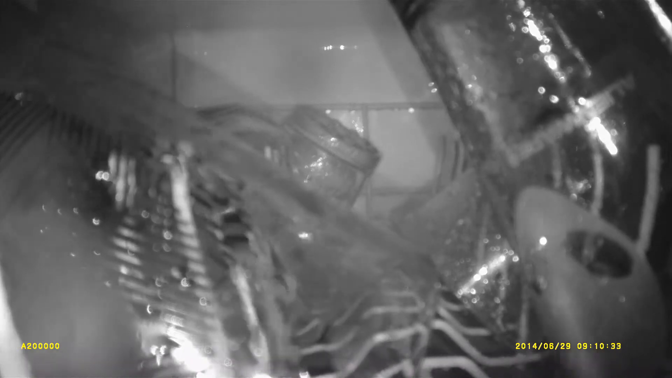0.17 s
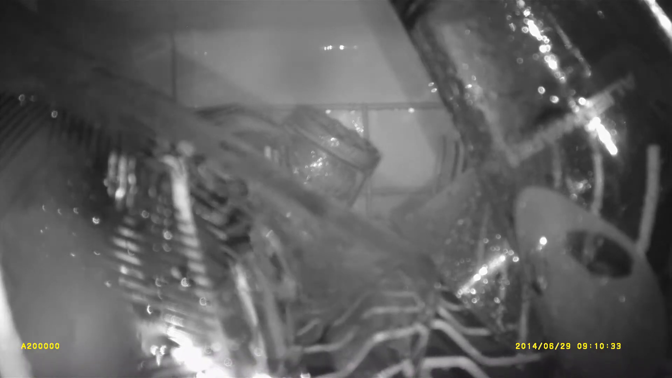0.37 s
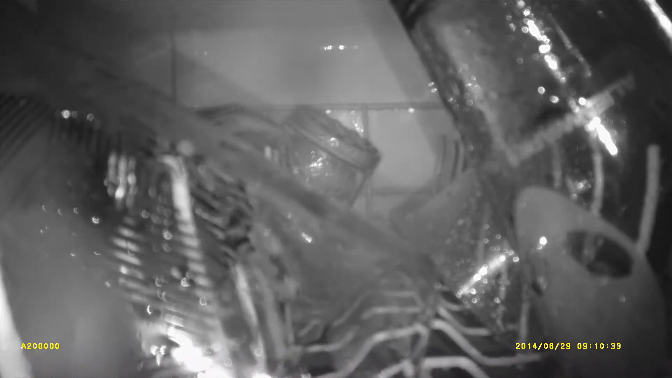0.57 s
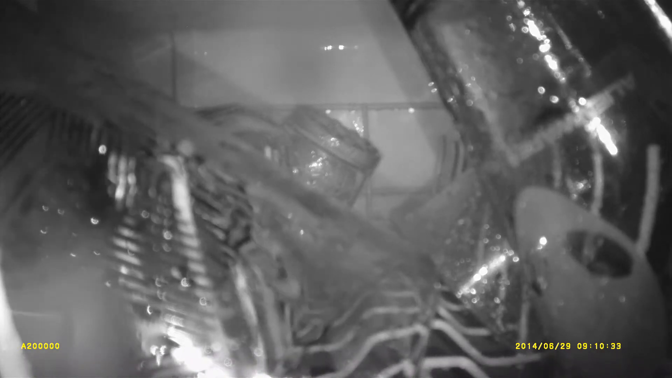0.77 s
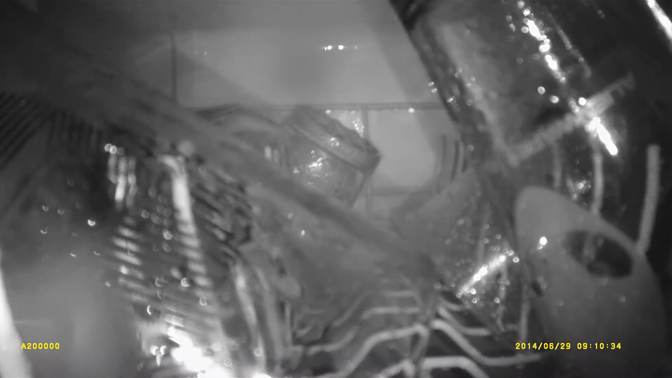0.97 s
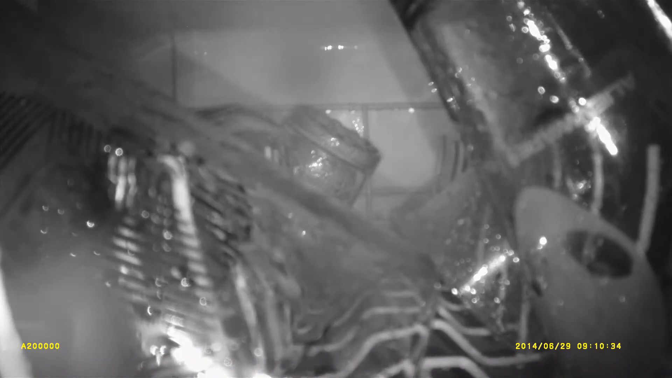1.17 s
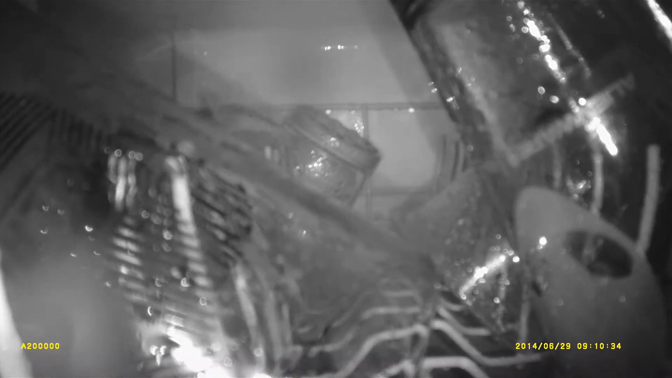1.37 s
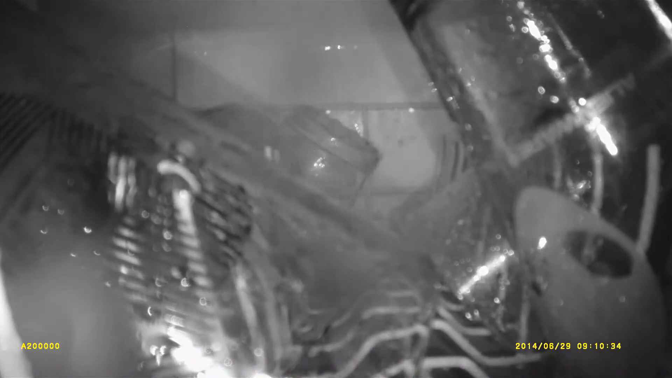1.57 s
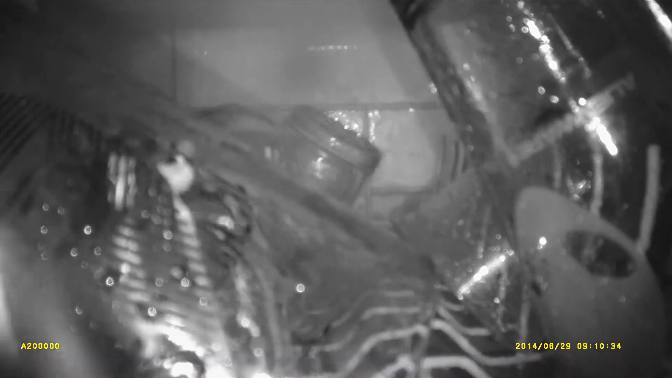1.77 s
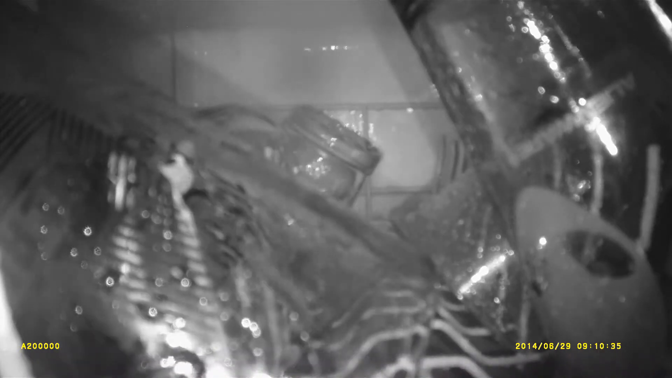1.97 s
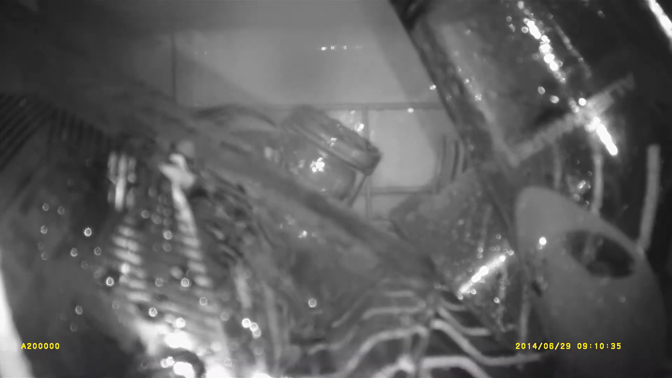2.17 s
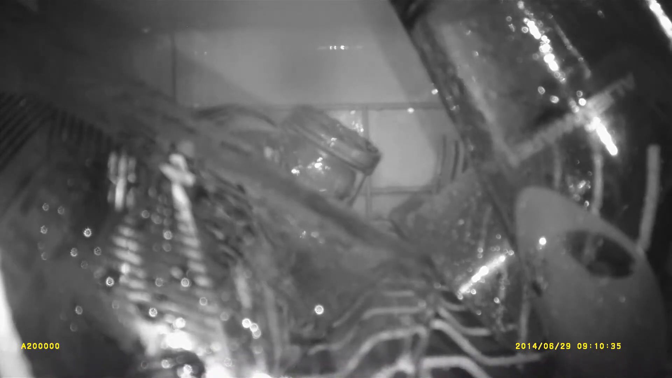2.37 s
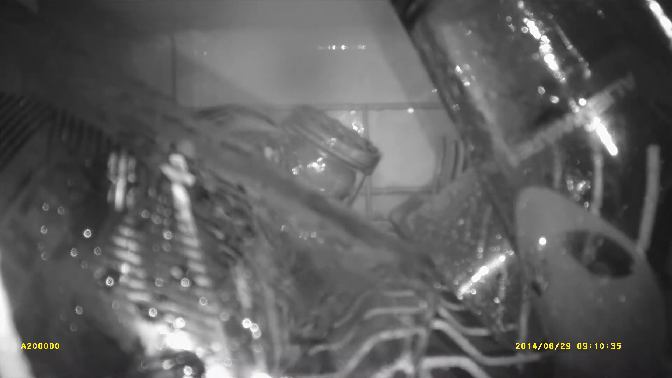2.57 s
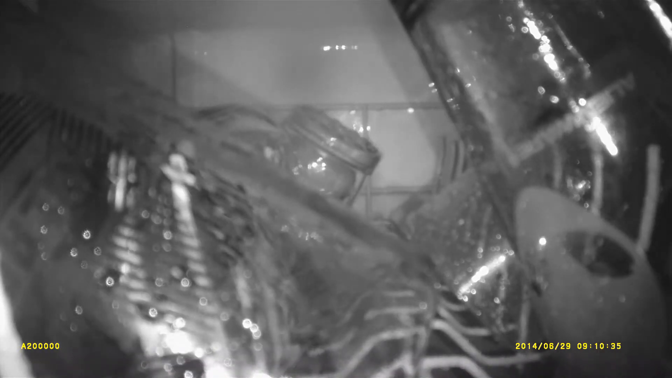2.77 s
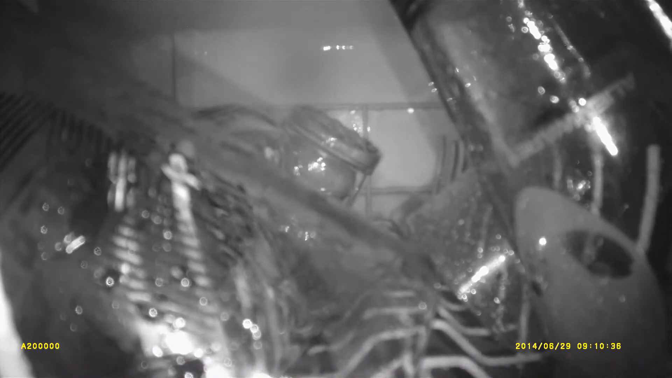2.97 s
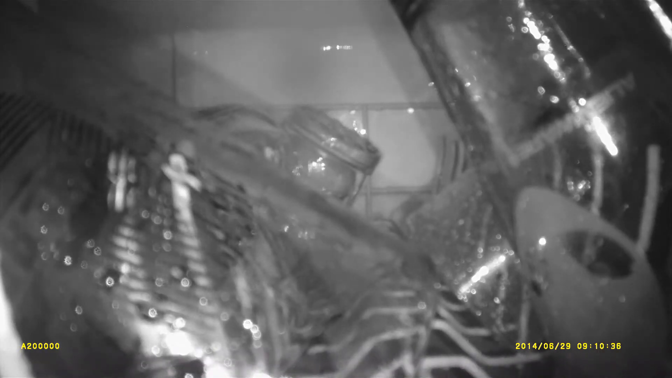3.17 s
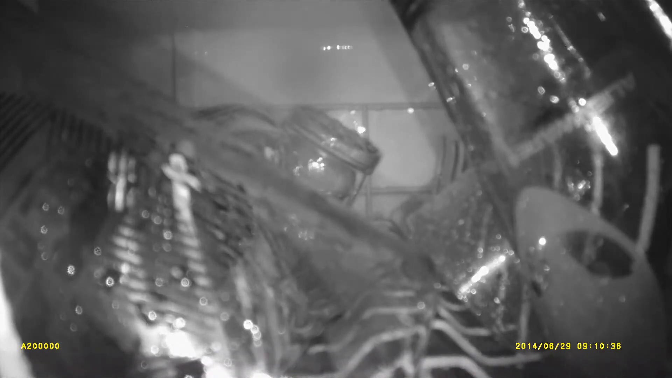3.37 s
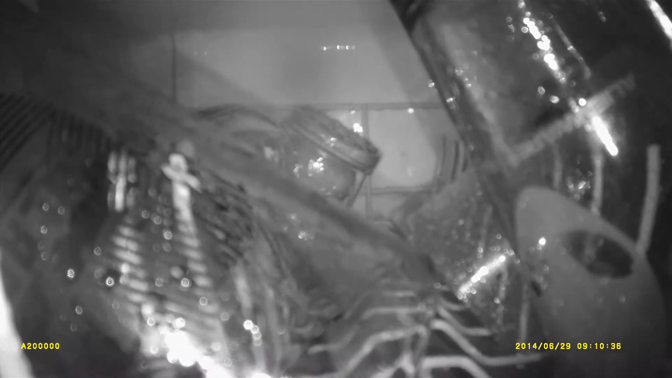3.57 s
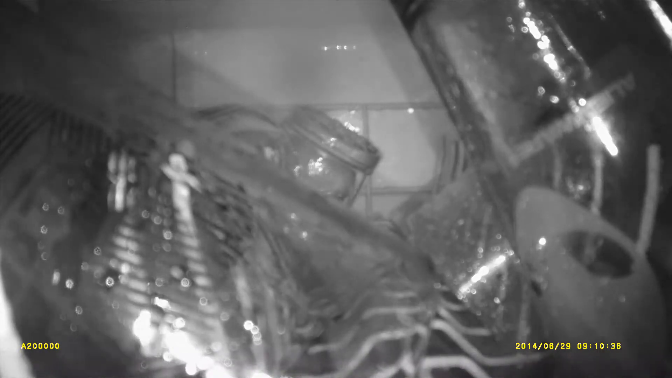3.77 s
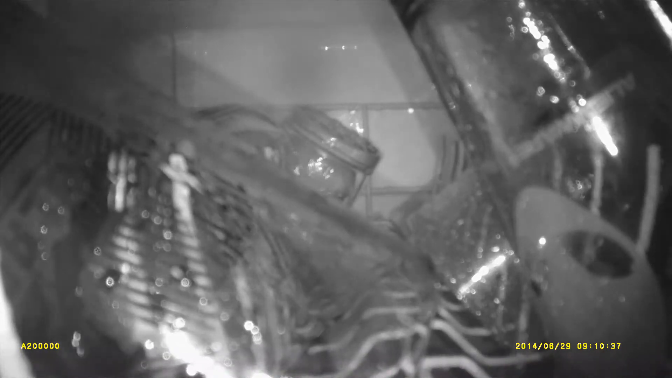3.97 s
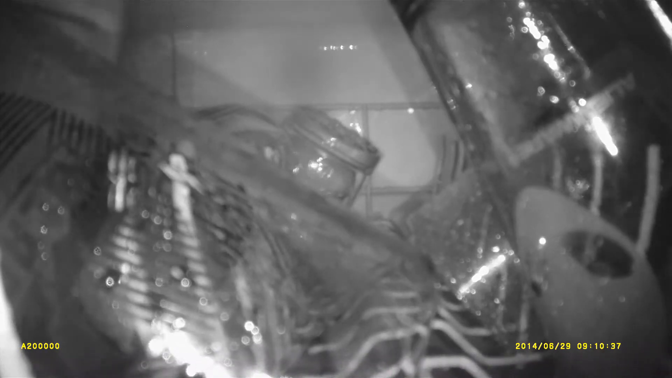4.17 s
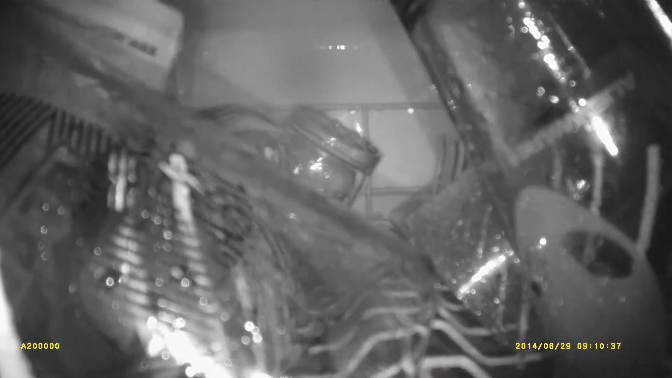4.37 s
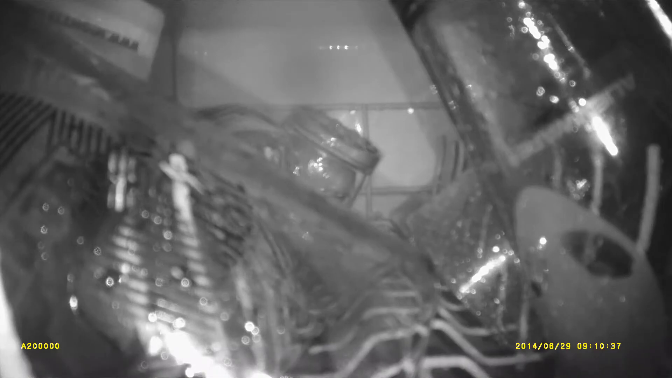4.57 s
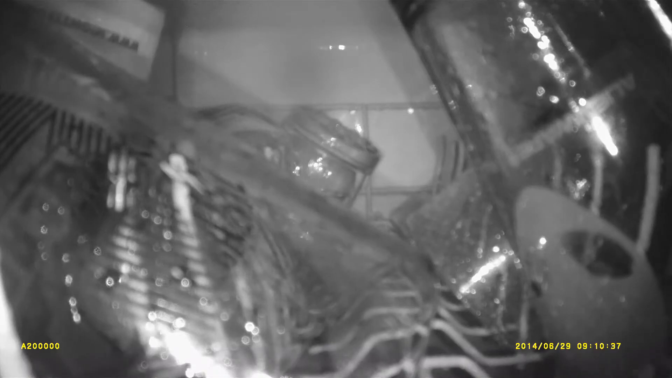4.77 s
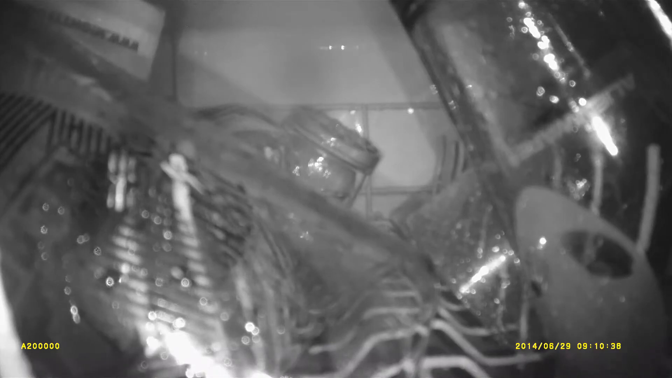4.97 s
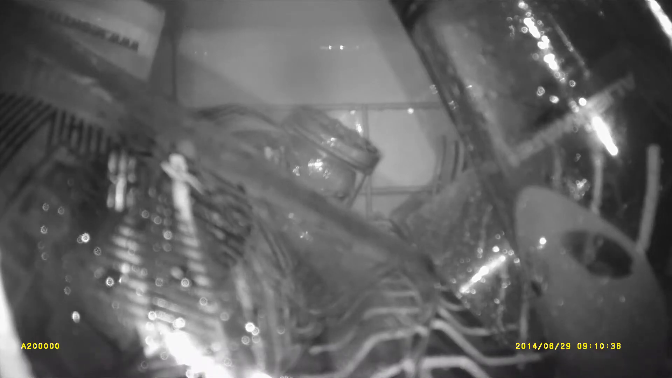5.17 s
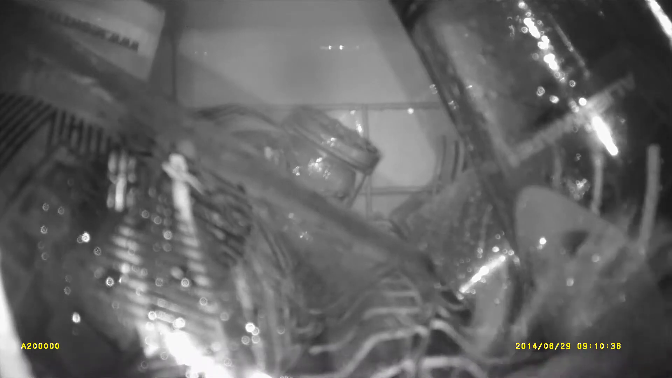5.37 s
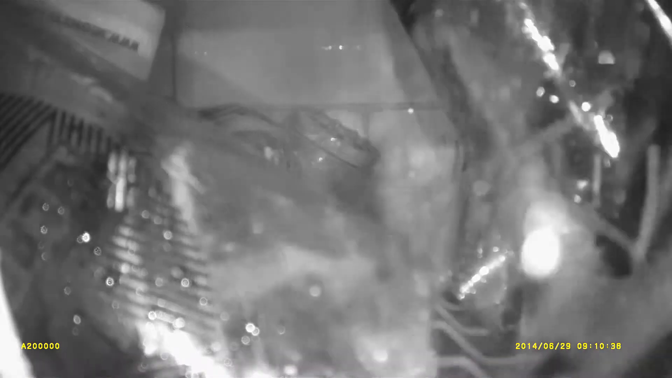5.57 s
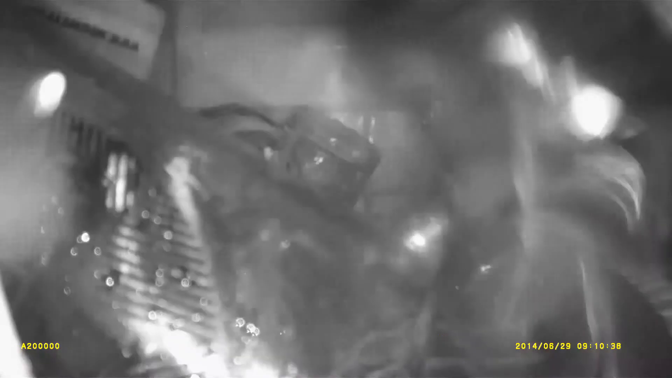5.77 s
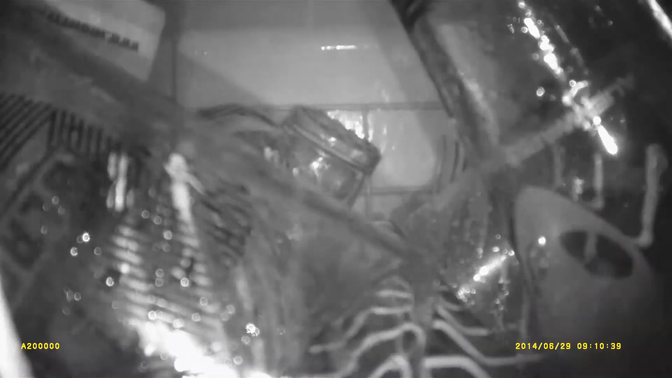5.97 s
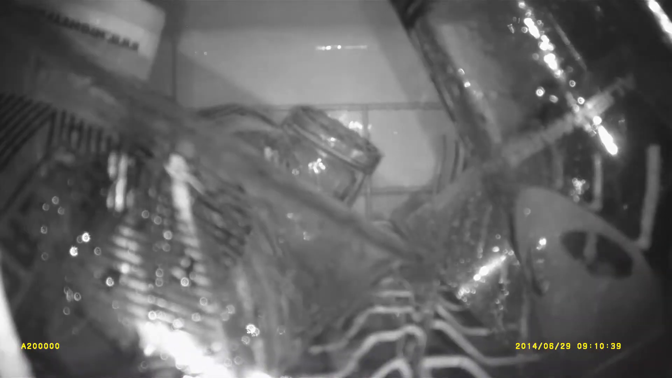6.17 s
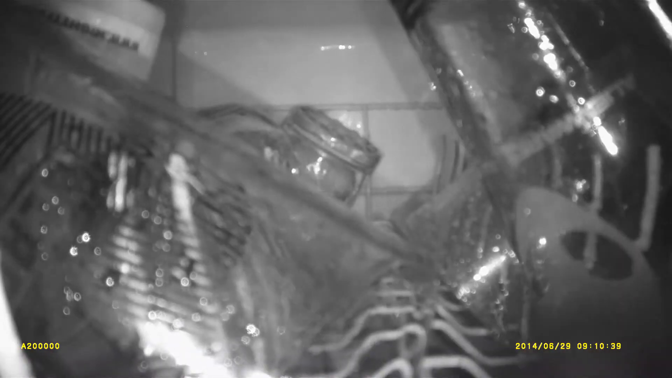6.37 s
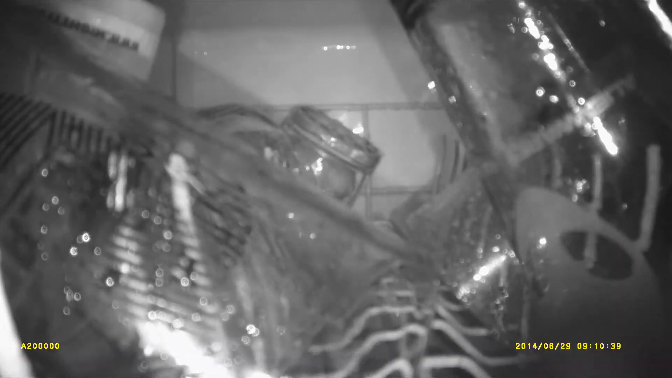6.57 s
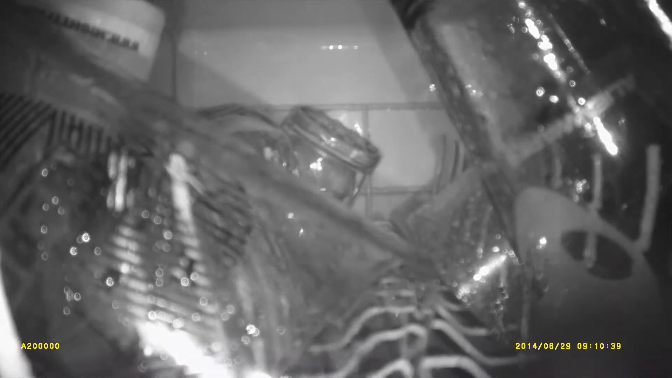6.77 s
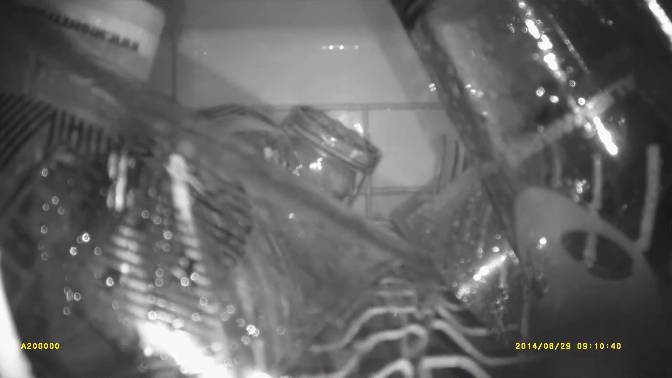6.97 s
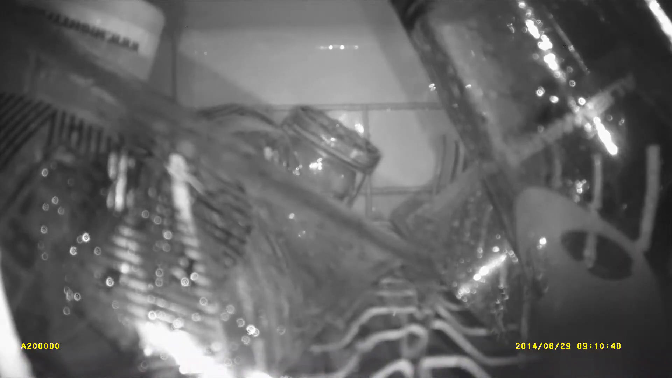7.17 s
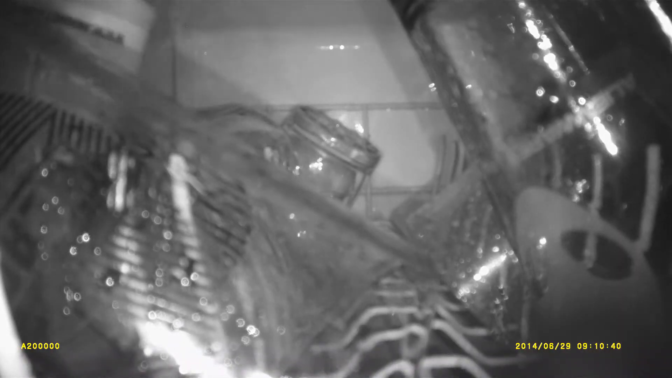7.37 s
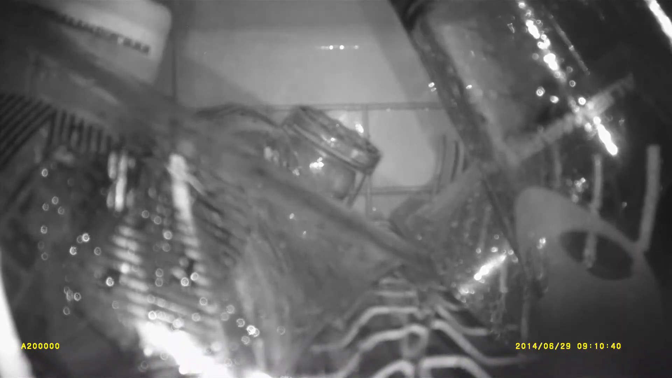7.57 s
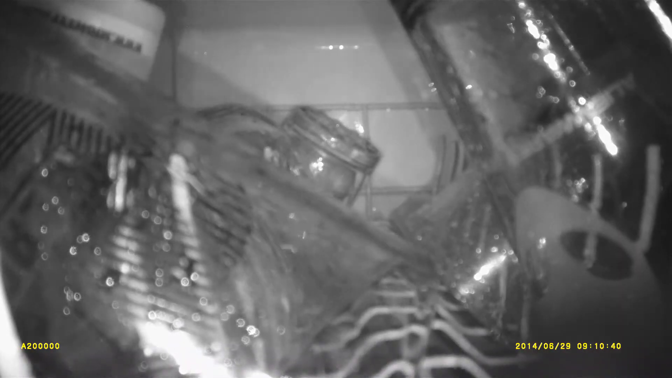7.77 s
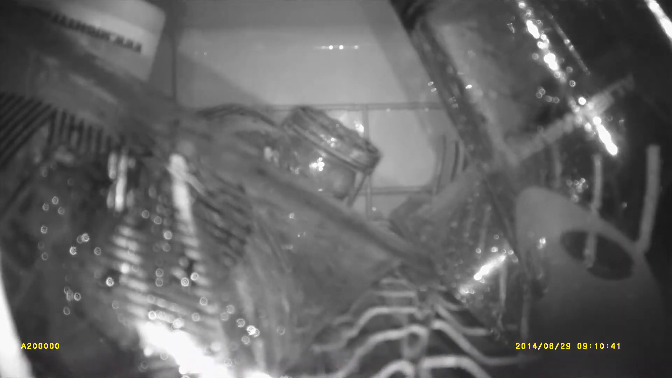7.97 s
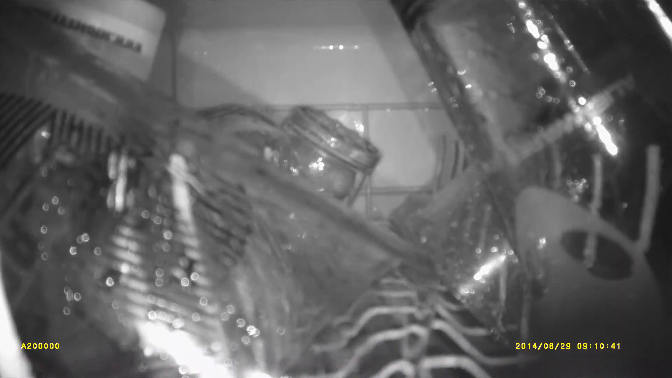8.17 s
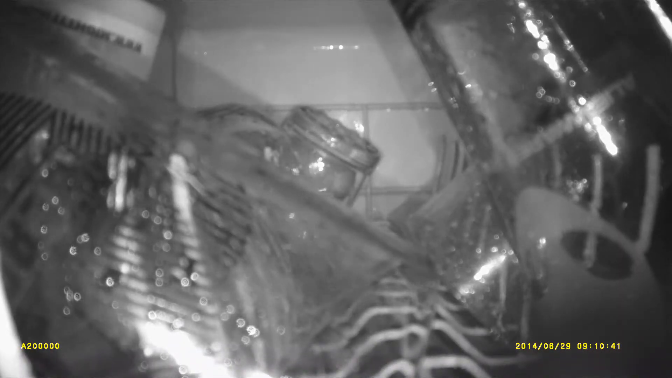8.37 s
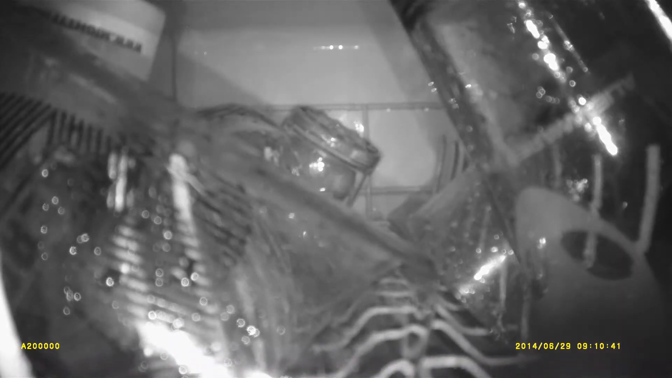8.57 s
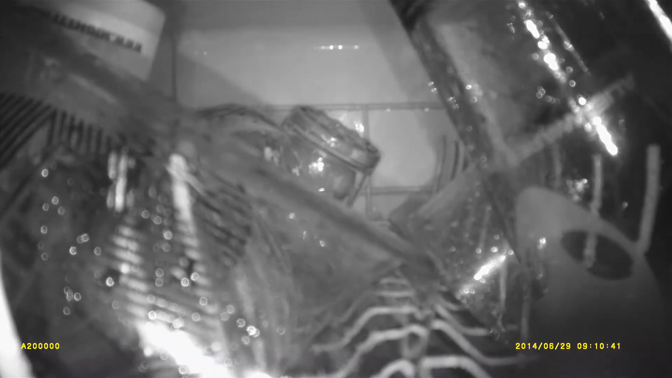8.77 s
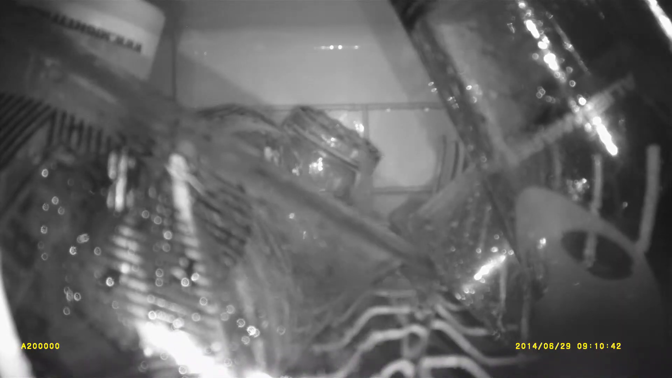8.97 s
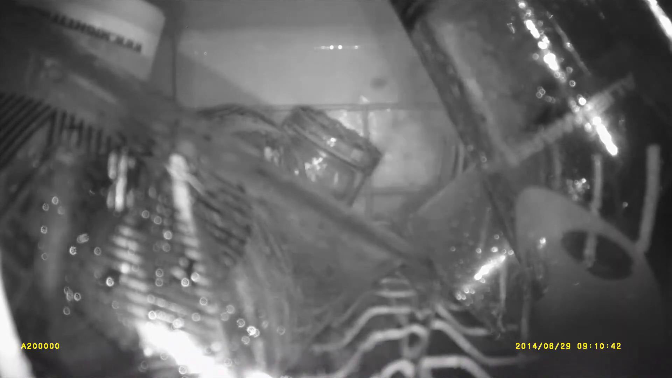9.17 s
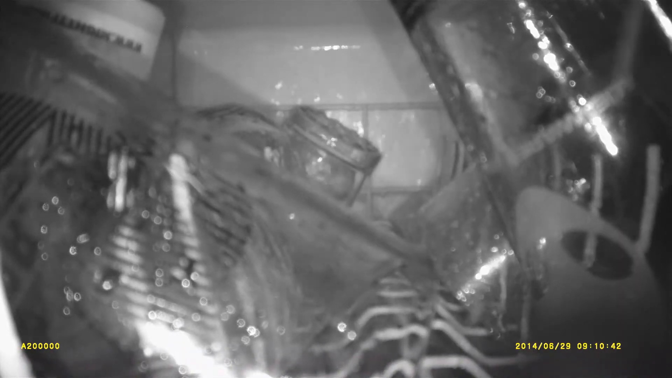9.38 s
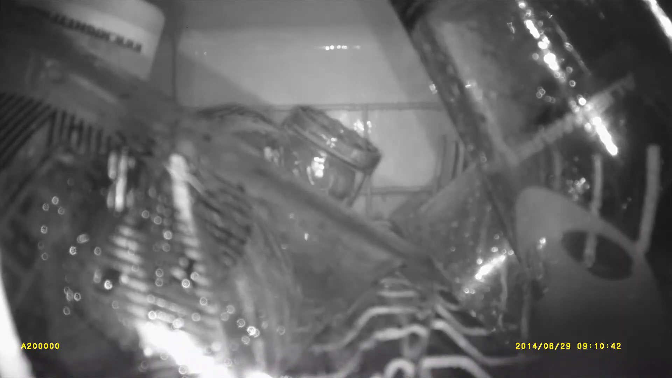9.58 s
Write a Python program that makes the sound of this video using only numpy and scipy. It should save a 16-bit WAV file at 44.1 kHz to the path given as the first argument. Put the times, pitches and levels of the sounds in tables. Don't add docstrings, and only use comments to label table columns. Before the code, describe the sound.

A dishwasher is heard from within its resonant tub, the microphone sealed in a wet case. A low electrical hum and rougher, slightly wavering pump drone continue throughout under boomy water drumming, splash and faint fizz. A faint pass opens, then fine spray. At about 1.4 seconds a jet slaps the microphone into clipping, followed by sharp drops until 1.75, with isolated ticks near 2.3 and 2.8. From 3.6 to 4.4 close jets thud and buzz panels, briefly ringing glasses. Around 5.45 to 5.8 comes the strongest burst: crowded slaps, hisses, knocks and distorted drumming. Ticks trail off near 6.2. Another pass at 7.2 to 7.55 strikes and rings dishes; fine spray swells near 7.9 and 8.8, and a quick splashy hiss passes at 9.1. The hum continues to the end at about 9.6, with gritty, stepped treble.

```python
import sys
import numpy as np
from scipy import signal
from scipy.fft import rfft, irfft, next_fast_len
from scipy.io import wavfile
from scipy.ndimage import uniform_filter1d, map_coordinates

SR = 44100
rng = np.random.default_rng(int(sys.argv[2]) if len(sys.argv) > 2 else 0)


def dump_mix(stems):
    frames = np.atleast_2d(stems).T
    limited = np.clip(frames, -1, 1)
    pcm = np.round(limited * 32767).astype(np.int16)
    wavfile.write(sys.argv[1], SR, pcm)


def attenuation_scalar(level_db):
    decades = np.asarray(level_db, float) / 20
    return 10 ** decades


N = 423801

# drumming, splash, fizz [dB].
REST_DB = (-31.5, -43.5, -67)


def unit(x):
    return x / np.sqrt(np.mean(x ** 2) + 1e-20)


def wobble(rate_hz):
    knots = rng.standard_normal(int(N * rate_hz / SR) + 4)
    return map_coordinates(knots, [np.arange(N) * rate_hz / SR])


def noise_band(size, low_hz, high_hz):
    band = signal.butter(3, [low_hz, high_hz], "bandpass", fs=SR, output="sos")
    return unit(signal.sosfilt(band, rng.standard_normal(size)))


def swell(s, db, before_s, after_s):
    late_s = np.arange(0, N / SR + .01, .005) - np.asarray(s)[:, None]
    span_s = np.where(late_s < 0, np.asarray(before_s)[..., None], np.asarray(after_s)[..., None])
    return np.sum((attenuation_scalar(db)[:, None] - 1) * np.exp(-abs(late_s / span_s) ** 1.33), axis=0)


def audio_db(gain):
    return np.interp(np.arange(N) / SR, np.arange(len(gain)) * .005, 20 * np.log10(1 + gain))


def motor():
    # multiple of hum, multiple of shaft, level in dB re shaft.
    tones = [(0, 2, -9), (1, 1, -16.5), (2, -1, -32.5), (0, 4, -12.5), (1, 2, -14.5), (0, 5, -14),
             (2, 1, -21), (2, 2, -24.5), (3, 2, -23.5)]
    # multiple of hum, level in dB re hum.
    hum_overtones = [(2, -29), (3, -49), (4, -36.5)]
    # time in seconds, level in dB.
    hum_levels = [(0.0, -19.5), (0.05, -17), (0.67, -22), (1.36, -18), (1.42, -21.5), (1.5, -17.5), (3.24, -21),
                  (4.31, -19.5), (4.98, -22), (5.99, -18.5), (7.04, -21.5), (7.47, -18.5), (7.6, -21.5),
                  (8.91, -21.5), (9.53, -17.5), (9.61, -21)]
    # time in seconds, loss in dB, length in seconds.
    stills = [(.12, 9.5, 0.12), (1.44, 14.5, 0.15), (1.998, 3.5, 0.23), (3.61, 21, 0.092), (3.95, 9, 0.092),
              (4.84, 2, 0.16), (5.38, 19.5, 0.065), (6.0, 8, 0.47), (7.26, 15, 0.15), (8.05, 7.5, 0.14),
              (9.147, 13, 0.15)]
    hum_hz, shaft_hz = 119.96, 56.75
    t = np.arange(N) / SR
    hum_db = np.interp(t, *np.transpose(hum_levels))
    s, loss_db, length_s = np.transpose(stills)
    shaft_db = -25.5 - audio_db(swell(s, loss_db, length_s, length_s))
    hum = 2 * np.pi * hum_hz * t
    shaft = 2 * np.pi * np.cumsum(shaft_hz + 0.12 * wobble(1.51)) / SR
    magnetic = np.sin(hum)
    for m, db in hum_overtones:
        magnetic += attenuation_scalar(db + 3.2 * wobble(1.7)) * np.sin(m * hum)
    turning = np.sin(shaft)
    for m, k, db in tones:
        turning += attenuation_scalar(db + 2.6 * wobble(5)) * np.sin(m * hum + k * shaft)
    magnetic *= attenuation_scalar(hum_db + 0.21 * wobble(10))
    turning *= attenuation_scalar(shaft_db + 0.37 * wobble(8))
    return np.sqrt(2) * (magnetic + turning)


def housing():
    # centre in Hz, width in Hz, level in dB.
    housing_notes = [(746, 15.5, -59.5), (790.6, 30, -57), (474.8, 11.4, -47.5)]
    return sum(attenuation_scalar(db) * noise_band(N, hz - width / 2, hz + width / 2) for hz, width, db in housing_notes)


def spray_db():
    # time in seconds, strength in dB, approach and leave in seconds.
    lower_arm = [
        (0.05, 4, 0.27, 0.12),
        (1.5, 13.5, 0.12, 0.13),
        (3.728, 16, .13, 0.097),
        (5.52, 17, 0.072, 0.055),
        (7.238, 7, 0.085, 0.075),
        (7.44, 14, 0.13, .08),
        (9.08, 14, 0.064, 0.098),
    ]
    # time in seconds, strength in dB, length in seconds.
    upper_arm = [(0.283, 10.5, 0.18), (1.334, 7.5, 0.57), (2.05, 8, 0.22), (3.49, 11.5, 0.14),
                 (4.253, 12, 0.21), (5.35, 7, 0.37), (5.912, 8, 0.36), (6.244, 4, 0.079), (7.006, 9, 0.12),
                 (7.92, 14, 0.21), (8.82, 12, 0.21), (9.62, 6, 0.087)]
    # time in seconds, level in dB, rise and fall in seconds.
    flood_rows = [
        (5.6, 20, 0.04, 0.054),
    ]
    coarse_share, fine_share = (.6, 0.85, 1.08), (0.21, 0.31, 0.87)
    earlier, later = (1.2, 0.86, 2.22), (1.4, 0.98, 0.83)
    drain_share, drain_s = (0.15, 0.25, 0.45), 0.54
    s, db, before_s, after_s = np.transpose(lower_arm)
    fine_s, fine_db, length_s = np.transpose(upper_arm)
    levels_db = []
    for k in range(3):
        gain = swell(s, coarse_share[k] * db, earlier[k] * before_s, later[k] * after_s)
        gain += swell(fine_s, fine_share[k] * fine_db, length_s, length_s)
        gain += swell(s, drain_share[k] * db, before_s, drain_s)
        if k == 0:
            gain += swell(*np.transpose(flood_rows))
        levels_db.append(REST_DB[k] + audio_db(gain))
    return levels_db


def coloured(x, spectrum):
    # centre in Hz, width in Hz, gain in dB.
    tub_modes = [(238, 9.7, 1.5), (285, 18, 4.5), (433, 19, 4), (500, 8.7, 2), (734, 6, 13),
                 (787.3, 13.3, 9.5), (1153, 46, 6.5), (1238, 6, 10.5), (1700, 87, 4.5), (2400, 19, 6)]
    m = next_fast_len(N + SR // 2)
    f = np.fft.rfftfreq(m, 1 / SR) + 1
    hz, db = np.transpose([(1, -120), *spectrum, (1.3 * spectrum[-1][0], -120)])
    tub = 1 + sum((attenuation_scalar(g) - 1) * 1j * f * w / (c * c - f * f + 1j * f * w) for c, w, g in tub_modes)
    shape = attenuation_scalar(np.interp(np.log(f), np.log(hz), db))
    return unit(irfft(rfft(x, m) * shape * tub, m)[:N])


def patchy(depth_db):
    z = signal.stft(rng.standard_normal(N + 512), nperseg=512)[2]
    field = uniform_filter1d(rng.standard_normal(z.shape), 5, axis=0)
    field = uniform_filter1d(field, 8, axis=1)
    return unit(signal.istft(z * attenuation_scalar(depth_db * unit(field)), nperseg=512)[1][:N])


def droplets(rate_hz):
    return unit((rng.random(N) < rate_hz / SR) * rng.standard_normal(N))


def plinks(rate_hz, hz, cycles):
    count = int(rate_hz * N / SR)
    when = rng.random(count)
    pitch, size = rng.standard_normal((2, count))
    t = np.arange(SR // 40) / SR
    f = hz * np.exp(.45 * pitch)[:, None]
    fade = np.exp(-t * f / cycles) * (1 - np.exp(-t * f / 0.5))
    notes = attenuation_scalar(1.1 * size)[:, None] * fade * np.sin(2 * np.pi * f * t)
    at = (when * N).astype(int)[:, None] + np.arange(len(t))
    return unit(np.bincount(at.ravel(), notes.ravel(), N + SR)[:N])


def port(x, width_hz):
    # time in seconds, note in Hz.
    port_note = [(0, 1460), (1.35, 1435), (1.45, 1700), (5.6, 1700), (5.75, 2090), (7.0, 2070), (7.3, 1850),
                 (8.0, 2000), (9.61, 1980)]
    f, t, z = signal.stft(x, SR, nperseg=512)
    note = np.interp(t, *np.transpose(port_note))
    f = f[:, None]
    pocket = note ** 2 / (note ** 2 - f * f + 1j * f * width_hz)
    return unit(signal.istft(z * pocket, SR, nperseg=512)[1][:N])


def water():
    # frequency in Hz, density in dB per Hz.
    drum_spectrum = [(20, -44.5), (30, -5.5), (60, 0.5), (130, 1), (250, -5.5), (480, -8.5), (560, -21.5),
                     (700, -34.5)]
    splash_spectrum = [(450, -22.5), (600, -1), (900, -7.5), (1400, -14.5), (1900, -19), (2500, -26),
                       (3200, -26.5)]
    fizz_spectrum = [(1700, -18.5), (2300, -3.5), (3000, -6.5), (4500, -5.5), (5300, -8), (6000, -18)]
    drum_db, splash_db, fizz_db = spray_db()
    surge_db = .5 * wobble(25) + 1.1 * wobble(55)
    drum = coloured(patchy(depth_db=1.43), drum_spectrum)
    patter = 0.32 * attenuation_scalar(.5 * (splash_db - REST_DB[1])) * droplets(600)
    splash = patchy(depth_db=1.0) + patter + 0.19 * plinks(250, hz=1100.6, cycles=11.0)
    splash = port(coloured(splash, splash_spectrum), width_hz=426)
    fizz = coloured(patchy(depth_db=1.8) + .5 * droplets(1500), fizz_spectrum)
    drum *= attenuation_scalar(drum_db + 0.5 + 0.68 * surge_db)
    splash *= attenuation_scalar(splash_db - 0.76 + surge_db)
    fizz *= attenuation_scalar(fizz_db + 1.0 + 1.55 * surge_db)
    return drum + splash + fizz


def slaps():
    # start in seconds, level in dB, swing in Hz, cycles, first direction (+1 or -1).
    slap_rows = [(1.4043, 11, 215, 1.36, 1), (1.4108, -5, 140, .7, -1), (5.66, 11, 360, 1.22, 1),
                 (5.5265, 1.5, 84, 2.3, -1), (5.5513, -2, 380, .9, 1), (5.5606, 9, 250, 1.2, -1),
                 (5.5757, 6, 520, 1.1, 1), (5.588, -7, 190, 2.2, 1), (5.6028, 5, 190, .6, 1),
                 (5.6135, -7, 110, .6, 1), (5.6243, -5, 190, .6, 1), (5.638, -1, 300, 1.1, -1)]
    out, t = np.zeros(N + SR), np.arange(SR // 10) / SR
    for s, db, hz, cycles, way in slap_rows:
        held = np.exp(-(t * hz / cycles) ** 4)
        out[round(s * SR):][:len(t)] += way * attenuation_scalar(db) * held * np.sin(2 * np.pi * hz * t)
    return out[:N]


def jets():
    # start in seconds, peak in dB, panel note in Hz, splash in dB re panel, length in seconds.
    jet_rows = [(1.436, -9.5, 420, -4, 0.072), (1.636, -2.5, 316, -21, 0.019),
                (2.485, -35, 280, -43, 0.043), (3.61, -16, 285, -11, 0.027), (3.74, -14, 433, -25, 0.1),
                (3.837, -3.5, 432, -29, 0.073), (3.878, 4, 261, -19.5, 0.041),
                (4.168, -5.5, 292, -24, 0.048), (4.332, -5.5, 326, -17, 0.059),
                (4.362, -7.5, 440, -26, 0.025), (5.445, -19, 342, 0.5, 0.05), (5.484, -14, 400, -12, 0.056),
                (5.569, -5, 290, -20, 0.029), (5.59, -11.5, 274, -10, 0.045), (5.684, -7, 200, -15, 0.045),
                (5.621, -8, 760, -12, 0.015), (5.644, -10, 740, -15, 0.012), (7.41, -10, 400, -20, 0.025),
                (7.488, 1.5, 290, -17, 0.026), (7.549, 1, 293, -25, 0.026), (9.059, -17, 300, -5, 0.026),
                (9.096, -22, 245, -7, 0.059), (9.135, -21, 202, -5, 0.04)]
    out, t = np.zeros(N + SR), np.arange(SR // 5) / SR
    for s, db, hz, splash_db, length_s in jet_rows:
        shape = (1 - np.exp(-t / 0.0016)) * np.exp(-(t / length_s) ** 2)
        panel = noise_band(len(t), 0.47 * hz, 1.68 * hz)
        splash = (1 + 1.5 * np.exp(-t / .006)) * noise_band(len(t), 550, 1900)
        out[round(s * SR):][:len(t)] += attenuation_scalar(db - 18.0) * shape * (panel + attenuation_scalar(splash_db) * splash)
    return out[:N]


def drops():
    # start in seconds, peak in dB, ring in Hz, T60 in seconds, push in dB re peak.
    drop_rows = [(1.5439, -19, 1320, 0.016, -4), (1.6312, -28.5, 1860, 0.013, -11),
                 (1.6373, -17, 1210, 0.021, -21), (1.7132, -3, 1440, 0.0055, -11.5),
                 (1.7476, -24.5, 1570, 0.012, 7), (2.323, -12.5, 1560, 0.0048, -12),
                 (2.839, -32, 1680, 0.015, -11), (5.4995, -13, 1570, 0.0097, -14),
                 (5.5627, -7.5, 1210, 0.012, 0), (5.584, -25, 1650, 0.0092, -10),
                 (5.6125, -9, 1370, 0.0082, -15), (5.638, -12, 1210, 0.0077, 3),
                 (5.6845, -29, 1580, 0.015, -24), (5.7724, -46, 1400, 0.012, -8),
                 (5.781, -38, 3200, 0.014, -6), (5.789, -26, 1560, 0.0058, -7),
                 (5.7981, 0.5, 2110, 0.0039, -22.5), (5.8374, -28.5, 2100, 0.016, -8),
                 (5.9215, -20.5, 1650, 0.0088, 0), (6.1895, -12, 1630, 0.007, -2.5)]
    out, t = np.zeros(N + SR), np.arange(SR // 20) / SR
    for s, db, hz, t60_s, push_db in drop_rows:
        pocket = np.sin(2 * np.pi * hz * t) + 0.37 * np.sin(2 * np.pi * 0.6 * hz * t)
        ring = attenuation_scalar(db + 3 - 60 * t / t60_s) * pocket * (1 - np.exp(-t / .00028))
        push = attenuation_scalar(db + push_db + 17) * t / 0.0025 * np.exp(1 - t / 0.00071)
        out[round(s * SR):][:len(t)] += ring + push
    return out[:N]


def spits():
    # start in seconds, peak in dB, T60 in seconds, centre in Hz.
    spit_rows = [(1.5858, -42, 0.012, 3600), (2.0194, -44, 0.017, 3470), (2.2378, -41, 0.012, 3380),
                 (3.88, -35.5, 0.021, 3430), (5.446, -36, .012, 2900), (5.4626, -36, 0.012, 4510),
                 (5.4985, -25, 0.012, 3600), (5.5234, -30, 0.016, 3320), (5.534, -23, 0.016, 3150),
                 (5.5445, -18.5, 0.014, 4700), (5.554, -29, 0.0095, 4030), (5.5613, -25, 0.014, 3000),
                 (5.574, -32, 0.011, 3100), (5.585, -41, 0.012, 3600), (5.6042, -44, 0.012, 3490),
                 (5.6146, -32, 0.014, 3710), (5.632, -41, 0.012, 3420), (5.661, -32.5, 0.0059, 3020),
                 (5.6605, -18, 0.012, 1100), (6.197, -46, .07, 4360), (6.7117, -36, 0.012, 4100),
                 (6.9466, -41, 0.012, 3210), (7.3946, -34, 0.013, 4220), (7.8351, -50, 0.012, 4260),
                 (9.1, -34.5, 0.17, 2020), (9.19, -43.5, 0.11, 3000)]
    out, t = np.zeros(N + SR), np.arange(SR // 10) / SR
    for s, db, t60_s, hz in spit_rows:
        fade = attenuation_scalar(db + 2.0 - 60 * t / t60_s) * (1 - np.exp(-t / .0006))
        out[round(s * SR):][:len(t)] += fade * noise_band(len(t), .7 * hz, 1.34 * hz)
    return out[:N]


def rings():
    # start in seconds, level in dB, note in Hz, T60 in seconds.
    ring_rows = [(8.21, -38, 2280, 0.065), (3.585, -24.5, 1730, 0.074), (3.61, -21, 1670, 0.054),
                 (3.88, -46, 2200, 0.05), (3.879, -12, 1050, 0.034), (3.93, -25, 740, 0.11),
                 (4.166, -22, 1140, 0.038), (4.335, -22, 1040, 0.048), (4.352, -15, 438, 0.06),
                 (6.19, -20, 1120, 0.022), (7.258, -27, 1605, .05), (7.343, -25, 1070, .04),
                 (7.425, -16, 730, 0.05), (7.486, -14.5, 780, 0.072), (9.06, -21, 1700, .05),
                 (9.06, -24, 750, 0.15), (7.3, -44, 3700, .08), (5.6, -10, 800, 0.023)]
    out, t = np.zeros(N + SR), np.arange(SR // 5) / SR
    for s, db, hz, t60_s in ring_rows:
        pair = np.sin(2 * np.pi * hz * t) + 0.27 * np.sin(2 * np.pi * 0.84 * hz * t)
        out[round(s * SR):][:len(t)] += attenuation_scalar(db - 60 * t / t60_s) * (1 - np.exp(-t / 0.002)) * pair
    return out[:N]


def scene():
    hiss = attenuation_scalar(-70.5) * noise_band(N, 2500, 5500)
    machine = motor() + housing() + water()
    strikes = slaps() + jets() + drops() + spits() + rings()
    return (machine + strikes + hiss)[None]


def thinned(x):
    # frequency in Hz, level in dB.
    audible = [(13700, -115), (14200, -99.5), (14850, -96.5), (15150, -84), (15500, -71.5), (16200, -60.5)]
    f, _, z = signal.stft(x, SR, nperseg=2048)
    starts = np.arange(0, len(f), 16)
    power = np.add.reduceat(abs(z) ** 2, starts, axis=1) / 16
    power = np.repeat(power, 16, axis=1)[:, :len(f)]
    weakest = attenuation_scalar(np.interp(f // 345 * 345, *np.transpose(audible), left=-200))
    return signal.istft(z * (power > weakest[:, None] ** 2), SR, nperseg=2048)[1][:, :N]


def top_cut(x):
    return signal.sosfilt(signal.butter(12, 16510, fs=SR, output="sos"), x)


def record(dry):
    camera_hz = 12000
    low = signal.resample_poly(dry, camera_hz, SR, axis=1)
    low = np.clip(low + .028, -1, 1)
    steps = np.repeat(low, 4, axis=1)
    x = signal.resample_poly(steps, SR, 4 * camera_hz, axis=1)[:, :N]
    return top_cut(np.clip(thinned(x), -1, 1))


dry = scene()
out = record(dry)
dump_mix(out)
```